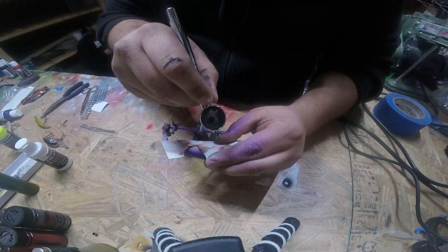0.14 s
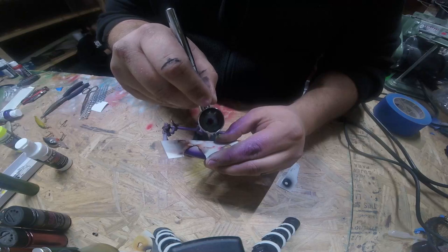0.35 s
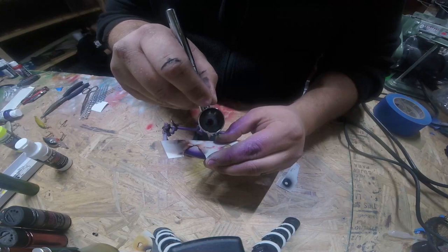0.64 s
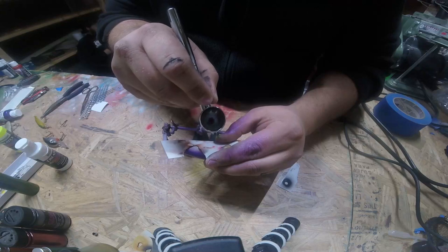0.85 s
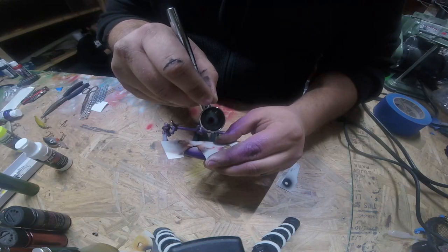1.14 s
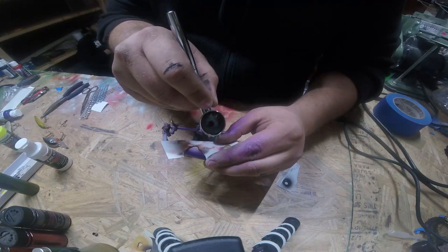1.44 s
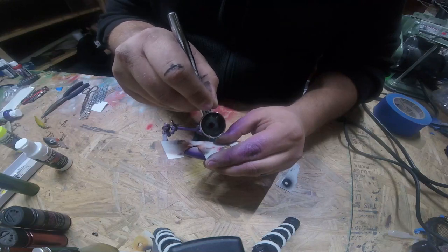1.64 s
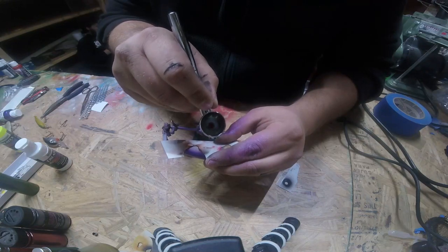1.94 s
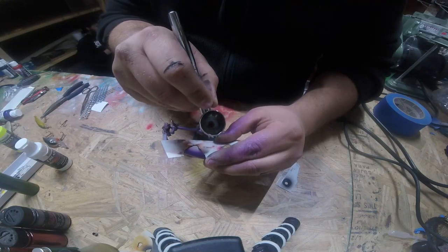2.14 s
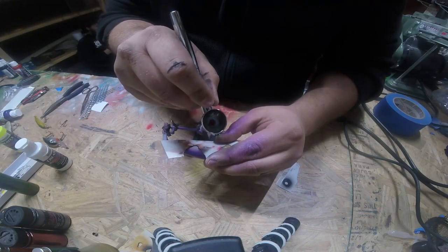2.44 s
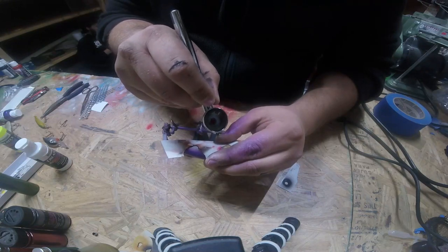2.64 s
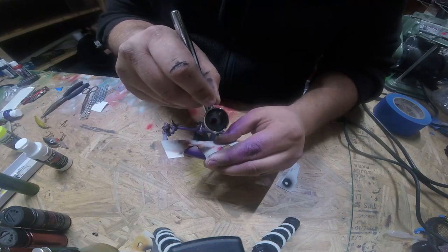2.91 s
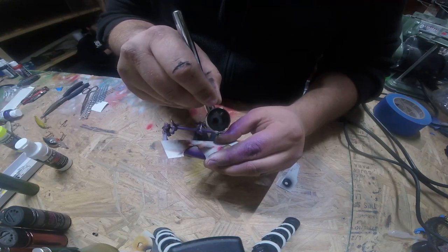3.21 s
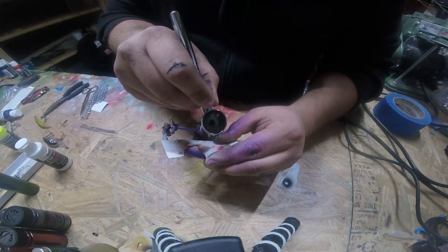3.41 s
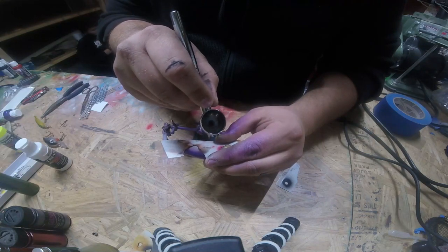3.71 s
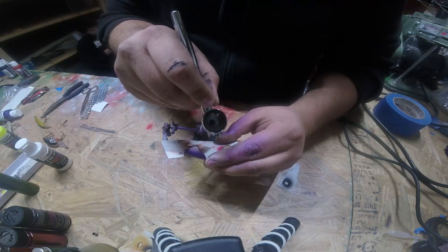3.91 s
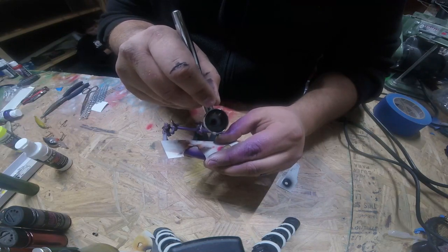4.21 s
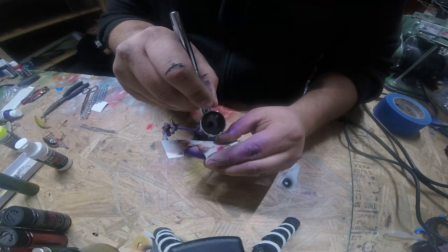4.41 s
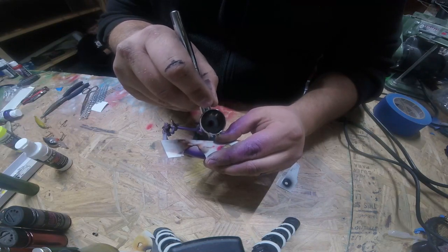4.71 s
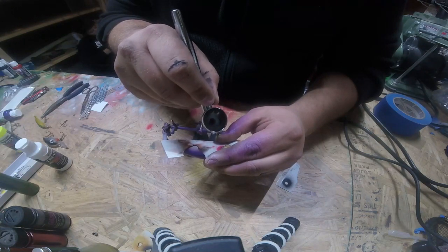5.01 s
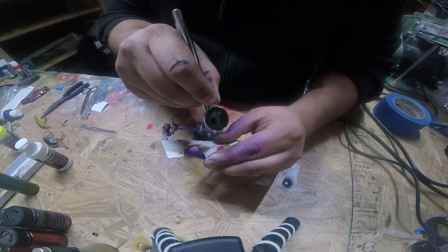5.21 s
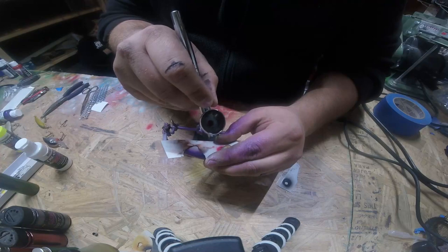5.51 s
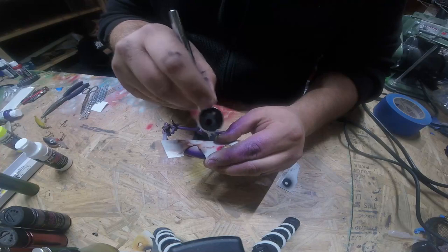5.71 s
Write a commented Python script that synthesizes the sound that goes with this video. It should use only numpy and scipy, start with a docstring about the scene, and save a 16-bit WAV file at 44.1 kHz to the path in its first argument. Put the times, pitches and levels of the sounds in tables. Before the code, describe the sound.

An airbrush hisses close by, its spray swelling into a fuller rush five times, then shuts off with a tiny tick over faint motor hum.

```python
"""An airbrush works on a small part over a bench, close to a mono microphone, with a motor humming behind.
From the start the air is on, and the spray swells over the part five times as a full rush of coloured noise.
Between passes the rush eases into the free jet: a thinner hiss with a wavering whistle of resonant noise.
At the end the valve shuts: the air collapses into a faint room tail and the trigger ticks.
A slight leak of ringing noise and the workshop's rumble and hum, there throughout, are left."""
import sys
import numpy as np
from scipy import signal
from scipy.fft import rfft, irfft, next_fast_len
from scipy.io import wavfile

SR = 44100
rng = np.random.default_rng(int(sys.argv[2]) if len(sys.argv) > 2 else 0)


def waveform_to_disk(signal):
    """Save audio, clipped to [-1, 1], as 16-bit WAV at the path in sys.argv[1]."""
    frames = np.transpose(np.atleast_2d(signal))
    scaled = np.clip(frames, -1, 1) * 32767
    samples = np.round(scaled).astype(np.int16)
    wavfile.write(sys.argv[1], SR, samples)


N = 258233
TIME = np.arange(N) / SR

# the spray is led over the part and off again; levels are before the spray's trim:
# (start [s], swell [s], swell exponent [below 1 rises early], time to ease to half power [s], peak [dB],
#  brightness offset [dB], time to cover the jet [s], time from start until the jet is half free again [s])
SPRAY_PASSES = [(-0.03, .24, 1.15, .062, -32.4, -3.0, .23, .325),
                (0.77, .49, 0.41, .19, -35.3, -1.8, .29, .69),
                (2.25, .975, .70, .115, -27.5, .55, 0.16, 1.31),
                (3.84, .378, .75, .058, -29.0, .7, .125, .575),
                (4.86, .405, .82, .072, -30.7, -.3, .135, .66)]


def spray(trim_db=-0.61, usual_db=-35.5, brightening=0.3, split_hz=2300, flutter_db=0.5):
    """The spray rushes over the part as turbulent noise; the harder it strikes, the more treble it has."""
    # broad colour of the spray on the part: (frequency [Hz], level [dB per Hz])
    colour = [(250, -32.5), (700, -22), (1600, -15.5), (2100, -6), (2700, -5), (4800, -14), (6000, -11),
              (7000, -16.5), (9000, -32), (10500, -42), (12500, -53), (15500, -44.8)]
    # peaks and notches from the nozzle cap, cupped hand and bench: (centre [Hz], width [Hz], height [dB])
    resonances = [(550, 50, -3.7), (810, 450, 5.5), (1110, 90, 4.1), (1320, 150, 7.3), (1690, 60, -2.9),
                  (2390, 70, -9.0), (2420, 240, 4.5), (2580, 80, 3.6), (2790, 80, 3.7), (3330, 160, -8.2),
                  (3700, 200, 5.1), (4110, 140, 4.3), (4490, 100, 5.5), (4890, 190, -8.1), (5680, 130, 4.7),
                  (6650, 70, -9.0), (6740, 260, -8.8), (7060, 90, -7.6), (7410, 230, -5.2),
                  (8230, 90, -6.9)]
    level_db, offset_db = strike()
    rush = turbulence(colour, resonances)

    low_pass = signal.butter(2, split_hz, fs=SR, output="sos")
    body = signal.sosfiltfilt(low_pass, rush)
    treble = rush - body
    brightness_db = brightening * (level_db - usual_db) + offset_db
    # the body gives way by twice as many dB as the treble gains
    rush = body * from_db(-brightness_db) + treble * from_db(brightness_db / 2)

    uneven_db = flutter_db * drift(9.9)   # paint leaves the needle unevenly
    return rush * from_db(level_db + trim_db + uneven_db)


def strike(overspray_db=-50.0, ease_steepness=3.1):
    """Force of the spray on the part and its brightness offset, in dB: each pass swells, peaks and eases off."""
    power = from_db(overspray_db) ** 2   # the fringe of the spray always brushes the part
    weighted_offset = 0
    for start, swell_s, exponent, ease_s, peak_db, offset_db, *_ in SPRAY_PASSES:
        age = TIME - start
        swell = np.clip(age / swell_s, 0, 1) ** exponent
        off_target = np.maximum(age - swell_s, 0) / ease_s
        # past its rounded peak, the power falls as a power of time
        share = (from_db(peak_db) * swell) ** 2 / (1 + off_target ** ease_steepness)
        power = power + share
        weighted_offset = weighted_offset + offset_db * share
    return 10 * np.log10(power), weighted_offset / power


def jet(trim_db=-1.13, flutter_db=0.55, whistle_hz=6520, whistle_width_hz=90, whistle_db=-15.0):
    """The free jet is thin turbulent hiss, with a wavering, airy whistle from the nozzle cap."""
    # broad colour of the free jet: (frequency [Hz], level [dB per Hz])
    colour = [(250, -22), (450, -20.5), (1500, -16.5), (2100, -9.5), (4200, -20), (5600, -9), (6600, -0.5),
              (7300, -18), (9700, -18), (10300, -38.5), (12000, -39), (13300, -41), (15500, -51)]
    # peaks and notches from the nozzle cap, cupped hand and bench: (centre [Hz], width [Hz], height [dB])
    resonances = [(730, 60, 4.0), (930, 50, 3.3), (1330, 170, 4.5), (1530, 330, -6.3), (2000, 130, 3.0),
                  (2380, 80, -6.5), (3340, 270, 4.9), (3790, 200, 9.0), (4350, 340, 6.9), (5120, 280, 7.4),
                  (5220, 190, -9.0), (6150, 130, -9.0), (6740, 100, -6.1), (7080, 60, -8.0),
                  (7510, 220, 7.2), (8270, 390, 6.1)]
    hiss = turbulence(colour, resonances) * from_db(flutter_db * drift(7.3))
    # the whistle's level is relative to the hiss
    whistle = ringing_noise(whistle_hz, whistle_width_hz) * from_db(whistle_db + 2 * drift(5.7))
    return (hiss + whistle) * from_db(free_jet_db() + trim_db)


def free_jet_db(uncover_s=.32, cover_loss_db=11):
    """The part mutes the free jet while it is in the way, and the jet returns gradually."""
    # strength of the jet with nothing in its way, before its trim: (time [s], level [dB])
    open_jet = [(0.3, -39.0), (1.6, -39.2), (2.1, -37.3), (3.7, -39), (4.4, -39.3), (4.75, -39),
                (5.65, -38.0)]
    covered = 0
    for start, *_, cover_s, length in SPRAY_PASSES:
        covering = np.clip((TIME - start) / cover_s, 0, 1)
        remaining = np.clip((start + length - TIME) / uncover_s + .5, 0, 1)
        covered = covered + covering * remaining
    return in_time(open_jet) - cover_loss_db * covered


def valve(shut_s=5.673, fade_s=0.0062, tail_db=-22.0, room_t60_s=.2):
    """Gain of the air flow: it collapses within milliseconds and a faint room tail follows."""
    after = np.maximum(TIME - shut_s, 0)
    collapse = np.exp(-after / fade_s)
    tail = from_db(tail_db - 60 * after / room_t60_s)
    return np.maximum(collapse, tail)


def trigger_tick(at_s=5.704, hz=5300, width_hz=600, level_db=-50.5, decay_s=0.0027):
    """The trigger springs back against its stop: a burst of ringing noise that dies away exponentially."""
    after = TIME - at_s
    envelope = (after > 0) * np.exp(-np.abs(after) / decay_s)
    return ringing_noise(hz, width_hz) * from_db(level_db) * envelope


def leak(hz=6560, width_hz=230, level_db=-66.5):
    """A steady trace of air keeps the nozzle ringing."""
    return ringing_noise(hz, width_hz) * from_db(level_db)


def reflections(x, echo_db=-15.5, count=14):
    """Weak echoes off the bench clutter and near walls put a fine ripple on the hiss."""
    lags = (rng.uniform(.004, .022, count) * SR).astype(int)
    signs = rng.choice([-1, 1], count)
    echoes = sum(sign * np.pad(x, (lag, 0))[:N] for lag, sign in zip(lags, signs))
    return x + from_db(echo_db) * echoes / np.sqrt(count)


def workshop(rumble_db=-49.0, wander_radians=0.34):
    """Shaped noise gives the room's low rumble; sines with a wandering phase give a motor's hum."""
    # workshop background: (frequency [Hz], level [dB per Hz])
    colour = [(15, -9), (30, 0), (105, -3), (140, -9.5), (215, -12.5), (290, -17.5), (550, -17.5),
              (1000, -23), (2000, -27), (4000, -35), (6000, -36), (7500, -34), (11000, -38), (15000, -63)]
    # room modes and the motor's rumble: (centre [Hz], width [Hz], height [dB])
    resonances = [(41.7, 3.3, -3), (58, 25, 3.5), (75, 21, -2), (96, 11, 1.5), (114, 12.5, 5),
                  (449, 78, 4.5), (595, 130, -2)]
    # motor hum: (frequency [Hz], level [dB rms])
    hum_tones = [(93.6, -65), (116, -61.5), (234, -59.4)]
    wander = wander_radians * drift(1.6)
    hum = 0
    for hz, level_db in hum_tones:
        hum = hum + np.sqrt(2) * from_db(level_db) * np.sin(2 * np.pi * hz * TIME + wander)
    return hum + from_db(rumble_db) * turbulence(colour, resonances)


def turbulence(colour, resonances):
    """Noise with a broad colour and bell-shaped peaks and notches; rms 1."""
    size = next_fast_len(N)
    hz = np.maximum(np.fft.rfftfreq(size, 1 / SR), 1)
    points_hz, points_db = np.transpose(colour)
    shape_db = np.interp(np.log(hz), np.log(points_hz), points_db)
    for centre, width, height_db in resonances:
        shape_db = shape_db + height_db * .5 ** ((2 * (hz - centre) / width) ** 2)
    spectrum = rfft(rng.standard_normal(size)) * from_db(shape_db)
    return rms_one(irfft(spectrum, size)[:N])


def ringing_noise(hz, width_hz):
    """Noise through one resonance; rms 1."""
    r = np.exp(-np.pi * width_hz / SR)
    feedback = [1, -2 * r * np.cos(2 * np.pi * hz / SR), r * r]
    return rms_one(signal.lfilter([1, 0, -1], feedback, rng.standard_normal(N)))


def drift(rate_hz):
    """Slow random wander, mostly below the given rate; spread about 1."""
    step = 40   # samples between the points of the curve
    r = np.exp(-2 * np.pi * rate_hz * step / SR)
    noise = rng.standard_normal(N // step + 2002)
    slow = signal.lfilter([1], [1, -2 * r, r * r], noise)[2000:]   # skip the filter's settling
    return np.interp(np.arange(N) / step, np.arange(len(slow)), rms_one(slow))


def in_time(rows):
    """Join the rows of a curve by straight lines."""
    return np.interp(TIME, *np.transpose(rows))


def rms_one(x):
    """Scale to unit power."""
    return x / np.sqrt(np.mean(x ** 2) + 1e-20)


def from_db(db):
    """Decibels to gain."""
    return 10 ** (np.asarray(db) / 20)


def scene():
    """The valve gates spray and jet; tick and leak join them, and one microphone feeds both channels."""
    airbrush = (spray() + jet()) * valve() + trigger_tick() + leak()
    mono = reflections(airbrush) + workshop()
    return np.array([mono, mono])


def record(dry, cutoff_hz=15680):
    """The top is cut steeply by an elliptic low-pass."""
    low_pass = signal.ellip(12, .1, 80, cutoff_hz, fs=SR, output="sos")
    return signal.sosfilt(low_pass, dry)


dry = scene()
out = record(dry)
waveform_to_disk(out)
```